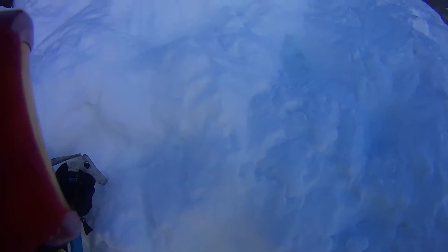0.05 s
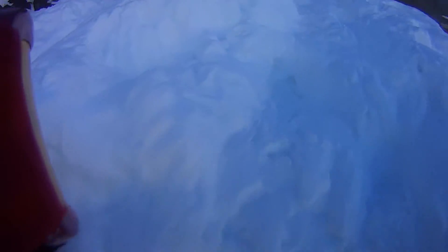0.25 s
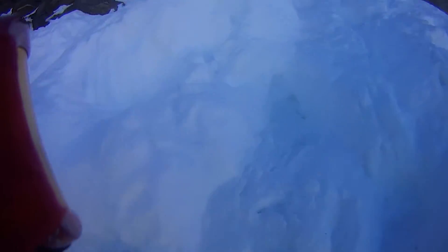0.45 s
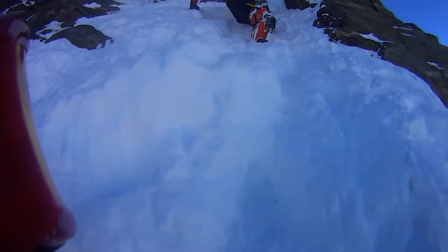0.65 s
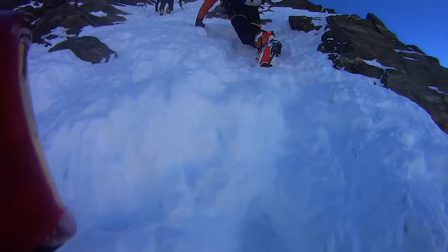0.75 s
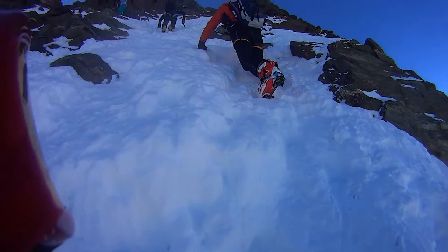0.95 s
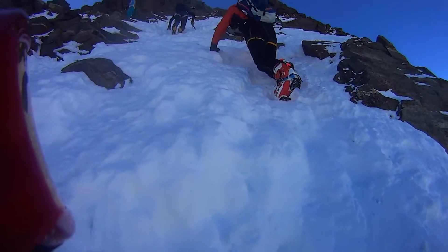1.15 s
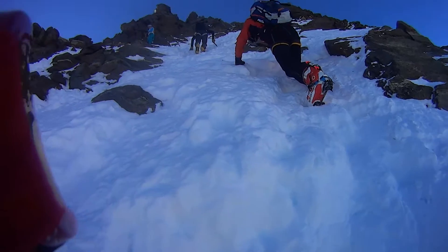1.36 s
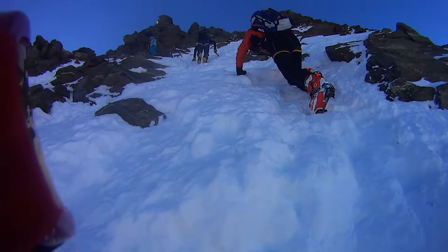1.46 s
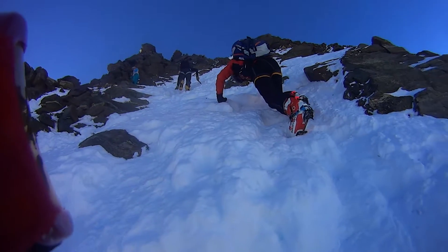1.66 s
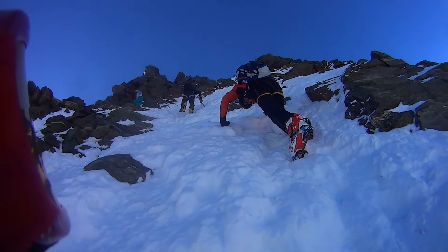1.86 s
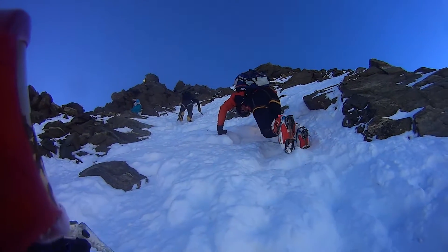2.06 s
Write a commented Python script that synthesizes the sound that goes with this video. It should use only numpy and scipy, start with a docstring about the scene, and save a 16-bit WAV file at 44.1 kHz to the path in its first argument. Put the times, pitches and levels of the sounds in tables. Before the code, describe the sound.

An ice tool thumps twice into a frozen mountainside, crunching the crust and jolting the climber's body-worn microphone. Its mount then creaks and ticks, ice crumbs patter and metal gear clinks once, with faint wind and hiss behind.

```python
"""Faint wind, hiss and a few small creaks, then two dull blows into a steep ice slope.
The sound is heard from a camera worn by the climber: each blow jolts its mount and makes it ring.
The ice crunches at the first blow and under later shifts of weight, and loose crumbs patter.
The mount ticks as it sticks and slips, clothing rubs it, and metal gear clinks near the end."""
import sys
import numpy as np
from scipy import signal
from scipy.fft import rfft, irfft
from scipy.io import wavfile

SR = 44100
rng = np.random.default_rng(int(sys.argv[2]) if len(sys.argv) > 2 else 0)


def master(y):
    """Save y as 16-bit WAV."""
    cut = np.clip(np.atleast_2d(y).T, -1, 1)
    pcm = np.round(cut * 32767)  # scale
    wavfile.write(sys.argv[1], SR, pcm.astype(np.int16))


N = 92610
T = np.arange(N) / SR


def from_db(db):
    """Turn decibels into a number to multiply by."""
    return 10 ** (np.asarray(db) / 20)


def unit_rms(x):
    """Scale a sound so its average strength (rms) is 1."""
    return x / np.sqrt(np.mean(x ** 2) + 1e-20)


def curve(rows):
    """Join (time, value) rows with straight lines."""
    return np.interp(T, *np.transpose(rows))


def filtered(x, hz, kind, order=2):
    """Keep the low part, the high part or a band of a sound."""
    sections = signal.butter(order, np.clip(hz, 10, SR * .45), kind, fs=SR, output="sos")
    return signal.sosfilt(sections, x + 1e-18)


def click(t):
    """One click of height 1 at time t."""
    return 1. * (np.arange(N) == int(t * SR))


def ring(x, hz, t60):
    """Each click starts a tone (as complex numbers) that fades by 60 dB in t60 seconds."""
    pole = np.exp((2j * np.pi * hz - np.log(1000) / t60) / SR)
    return signal.lfilter([1], [1, -pole], x + 1e-18)


def panned(tone, pan_db):
    """Make a tone stereo, with the left side pan_db above the right."""
    return tone.real * from_db(np.array([[.5], [-.5]]) * pan_db)


def grains(per_s, spread_db):
    """Random clicks of uneven size."""
    sizes = from_db(spread_db * np.minimum(rng.exponential(1, N), 3))
    return sizes * rng.choice([-1, 1], N) * (rng.random(N) < per_s / SR)


def swell(t, rise_s):
    """Start at time t, rise to 1 in rise_s, then die away."""
    age = np.maximum(T - t, 0) / rise_s
    return age * np.exp(1 - age)


def noise(spectrum, likeness):
    """Stereo noise with a given tone colour; likeness 1 makes both sides the same."""
    hz, db = np.transpose(spectrum)
    f = np.maximum(np.fft.rfftfreq(N, 1 / SR), 1)
    gain = from_db(np.interp(np.log(f), np.log(hz), db, right=-120))
    mid, side = irfft(rfft(rng.standard_normal((2, N))) * gain, N)
    return unit_rms(np.sqrt(1 + likeness) * mid + np.sqrt(1 - likeness) * side * [[1], [-1]])


# Tone colour of the hiss: f/Hz, relative level/dB
HISS_COLOUR = [(100, -5), (250, 4), (430, 12.5), (600, 3.5), (900, 4), (1500, 7.5), (2200, 2), (3100, 2.5),
               (4000, -2.5), (4800, -2), (7000, -4), (11000, -7.5)]

def hiss():
    """A steady, faint hiss lies behind everything."""
    return from_db(-53.5) * noise(HISS_COLOUR, likeness=.083)


# Tone colour of the wind: f/Hz, relative level/dB
WIND_COLOUR = [(20, -5), (40, 4.5), (70, -5), (130, -3.5), (180, -11.5), (250, -21), (600, -25)]
# Loudness of the wind before gusts are added: t/s, level/dB
WIND_LOUDNESS = [(0, -52.5), (.18, -56), (.25, -42), (.31, -42.5), (.36, -45.5), (.41, -53), (.5, -58),
                 (.6, -59), (1.0, -53), (1.17, -58), (1.44, -52), (1.58, -67), (1.7, -50.5), (1.92, -56.5),
                 (2.1, -49)]

def wind():
    """Low wind rumbles in uneven gusts."""
    gusts_db = 3 * unit_rms(filtered(rng.standard_normal(N), 36, "low"))
    return from_db(curve(WIND_LOUDNESS) + gusts_db) * noise(WIND_COLOUR, likeness=.92)


# Touches on the metal gear: t/s, level/dB
GEAR_TOUCHES = [(1.5995, -55), (1.6347, -51), (1.6574, -40.5)]
# Trembling of the gear: t/s, level/dB
GEAR_TREMBLE = [(0, -69), (1.1, -75), (1.3, -67), (1.6, -59), (1.7, -69), (1.75, -65.5), (2.1, -60.5)]

def metal_gear(hz=4720):
    """Dangling metal jingles faintly, and rings with a clink when touched."""
    touches = sum(from_db(db) * click(t) for t, db in GEAR_TOUCHES)
    clink = panned(ring(touches, hz, t60=.12), pan_db=-4.5)
    jingle = unit_rms(ring(grains(670, spread_db=4.5), hz, t60=.012).real)
    return clink + from_db(curve(GEAR_TREMBLE)) * jingle


# Crumbs of ice: t/s, level/dB, f/Hz
ICE_CRUMBS = [(1.171, -55.5, 5740), (1.227, -52, 5600), (1.274, -51.5, 4500), (1.65, -54, 6540),
              (1.701, -58, 9000), (1.936, -54.5, 8000), (2.0532, -49, 6550), (2.085, -57, 9500),
              (2.089, -51, 6400)]

def ice_crumbs(band_ratio=1.079):
    """Each loose crumb makes a short, bright rasp."""
    patter = 0
    for t, db, hz in ICE_CRUMBS:
        rasp = filtered(rng.standard_normal((2, N)), [hz / band_ratio, hz * band_ratio], "band", order=1)
        patter += from_db(db) * swell(t, rise_s=.0038) * unit_rms(rasp)
    return patter


# Single creaks of the mount: t/s, level/dB, f/Hz
CREAK_TICKS = [(.131, -41.5, 1460), (0.156, -45, 1620), (0.176, -53, 1440), (0.342, -27, 1660),
               (.391, -34, 1480), (0.404, -25.5, 1590), (.418, -30, 1570), (0.6402, -31, 1577),
               (0.686, -44, 1660), (.724, -42, 1590), (0.7621, -34, 1645), (0.8375, -39, 1610),
               (0.888, -43, 1650), (1.17, -41.5, 1450), (1.2845, -41, 1596), (1.3215, -44, 1800),
               (1.34, -38, 1570), (1.6479, -37.5, 1560), (1.6801, -37, 1490), (1.7, -40, 1410),
               (1.765, -35, 1500), (1.8001, -36.5, 1510), (1.824, -40, 1500), (2.023, -32.5, 1540),
               (2.028, -36, 1530), (2.048, -43, 1560)]
# Strain on the mount, given as the loudness of its fine creaking: t/s, level/dB
MOUNT_STRAIN = [(0, -48), (.09, -70), (.16, -44.5), (.39, -46.5), (.56, -55), (.72, -50), (.86, -49),
                (1.0, -53.5), (1.12, -57.5), (1.33, -51.5), (1.5, -53), (1.73, -55.5), (1.85, -46),
                (1.91, -54.5), (2.0, -51), (2.07, -49.5)]

def mount_creaks(rise_s=.0014, fine_hz=1590, fine_t60=.012):
    """The mount sticks and slips: single ticks over a fine creaking that follows the strain."""
    ticks = np.zeros(N, complex)
    for t, db, hz in CREAK_TICKS:
        start = int(t * SR)
        age = T[:min(SR // 20, N - start)]
        shape = age / rise_s * np.exp(1 - age / rise_s)
        ticks[start:start + len(age)] += from_db(db) * shape * np.exp(2j * np.pi * hz * age)
    fine = ring(grains(900, spread_db=5), fine_hz, fine_t60)
    fine = ring(fine, fine_hz, fine_t60 / 2)  # ringing twice softens each start
    return panned(ticks + from_db(curve(MOUNT_STRAIN)) * fine / np.std(fine.real), pan_db=-5.5)


def clothing_force():
    """Clothing rubs the mount, harder as the strain grows."""
    strain_db = curve(MOUNT_STRAIN)
    rubbing = unit_rms(filtered(grains(1500, spread_db=4), [380, 1800], "band"))
    return from_db(-78.5 + .87 * (strain_db - strain_db.mean())) * rubbing


# Crunches in the crust: t/s, length/s, relative level/dB, brightness f/Hz
ICE_CRUNCHES = [(0.199, 0.0091, -34.5, 1500), (0.228, 0.012, -24.5, 1760), (0.31, 0.026, -28.5, 2020),
                (1.256, 0.024, -52.5, 5000), (1.336, 0.012, -44.5, 1490), (1.404, 0.0096, -46, 870),
                (1.639, 0.011, -49, 3000), (1.933, 0.019, -41, 6000), (1.958, 0.0082, -36.5, 910)]
# Tone colour of the icy spray: f/Hz, relative level/dB
SPRAY_COLOUR = [(800, 3.5), (1900, -1.5), (3250, 1.5), (3750, -8), (5000, -9), (11000, -37)]

def ice_crunches(rise_s=.0023, fade_s=.013, hollow_hz=486):
    """Many tiny breaks in the crust shake the mount and throw a fine spray."""
    snaps = unit_rms(filtered(grains(2500, spread_db=5.5), 458, "high", order=4))
    hollow_note = signal.lfilter(*signal.iirpeak(hollow_hz, Q=4, fs=SR), snaps)
    breaks = snaps + from_db(.5) * hollow_note
    force, total_level = 0, 0
    for t, length, db, hz in ICE_CRUNCHES:
        rise = np.clip((T - t) / rise_s, 0, 1)
        fade = np.exp(-np.maximum(T - t - length, 0) / fade_s)
        level = from_db(db) * rise * fade
        force += level * filtered(breaks, hz, "low", order=1)
        total_level += level
    spray = from_db(-12) * total_level * noise(SPRAY_COLOUR, likeness=.2)
    return from_db(-12.5) * force, spray


# Contacts with the ice, two blows and their bounces: t/s, relative level/dB, brightness f/Hz
ICE_CONTACTS = [(.2202, -1.5, 4530), (.2245, -14.5, 2010), (.2268, -20, 1580), (.2312, 3.5, 1100),
                (0.2434, 2, 500), (0.245, 1.5, 244), (.2625, -9.5, 900), (0.4374, -1, 3020),
                (0.4406, -10.5, 2020), (0.4615, 1, 750)]

def blow_force(scatter_db=5, smear_hz=1100):
    """Each blow is a sharp jolt and duller bounces, passed on through the climber's body."""
    strengths = from_db(scatter_db * rng.standard_normal(len(ICE_CONTACTS)))
    force = sum(strength * from_db(db) * filtered(click(t), hz, "low", order=3)
                for strength, (t, db, hz) in zip(strengths, ICE_CONTACTS))
    _, poles = signal.iirpeak(smear_hz, Q=.99, fs=SR)
    return signal.lfilter(poles[::-1], poles, force)  # the body delays some pitches more than others


def ice_cracks(hard_hz=3400):
    """The ice snaps briefly under each contact; those duller than hard_hz crack less."""
    level = sum(from_db(db - 32.5) * min(hz / hard_hz, 1) ** 3 * swell(t, rise_s=.00043)
                for t, db, hz in ICE_CONTACTS)
    return level * noise([(1000, -24), (3000, 1), (5000, 11), (11000, -10)], likeness=.25)


# Natural notes of the mount: f/Hz, relative level/dB, time to fade by 60 dB/s, left minus right/dB
MOUNT_NOTES = [(39.9, -34.5, 0.26, 0.5), (95, -21.5, 0.017, -15.5), (170.8, -19, 0.097, 6),
               (346, -17.5, 0.072, 3.5), (440.5, -17, 0.056, 2), (495.4, -19, 0.046, -2.5),
               (582, -19.5, 0.043, 1.5), (655.5, -23, 0.083, -4), (693, -37.5, 0.24, -3),
               (770, -36.5, 0.21, -9), (1268, -17, 0.026, -11), (1450, -11.5, 0.026, 0),
               (1610, -12.5, 0.022, -6.5), (3000, -12, .01, -6.5), (3200, -10.5, 0.01, -2.5)]

def mount_ring(force, bend_hz=1000, muffle_hz=3450):
    """A push makes the mount ring with all its notes; the camera case muffles the highs."""
    notes = 0
    for k, (hz, db, t60, pan_db) in enumerate(MOUNT_NOTES):
        sign = (-1) ** k if hz > bend_hz else 1  # high notes bend the case in alternating directions
        notes += sign * from_db(db) * panned(ring(force, hz, t60), pan_db)
    lows = filtered(notes, muffle_hz, "low", order=6)
    return lows + from_db(-18) * filtered(notes, muffle_hz, "high")


# How far the left microphone's wave runs ahead of the right: f/Hz, phase/rad
LEFT_LEAD = [(100, 0), (170, 1), (330, -1.3), (700, -1), (1400, -.6), (2200, -1), (3000, -1.8), (5000, -5),
             (11000, -11)]

def scene():
    """Near sounds bend round the case and reach the two microphones out of step, over wind and hiss."""
    crunch_force, spray = ice_crunches()
    ringing = mount_ring(blow_force() + crunch_force + clothing_force())
    left, right = ringing + spray + ice_cracks() + mount_creaks() + ice_crumbs() + metal_gear()
    lead = np.interp(np.fft.rfftfreq(2 * N, 1 / SR), *np.transpose(LEFT_LEAD))
    left = irfft(rfft(left, 2 * N) * np.exp(1j * lead))[:N]
    return np.array([left, right]) + wind() + hiss()


def record(dry, peak_limit=.75, cutoff_hz=11200):
    """Round off the sharpest peaks and cut away the highest treble."""
    rounded = dry / (1 + (dry / peak_limit) ** 4) ** .25
    return signal.sosfilt(signal.ellip(10, .2, 70, cutoff_hz, fs=SR, output="sos"), rounded)


dry = scene()
out = record(dry)
master(out)
```